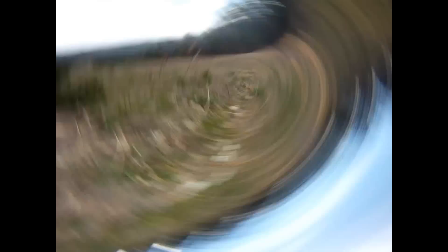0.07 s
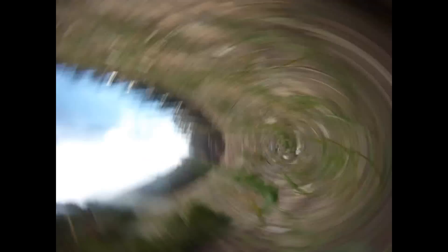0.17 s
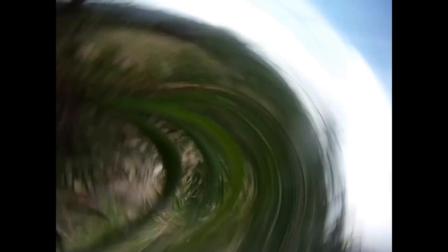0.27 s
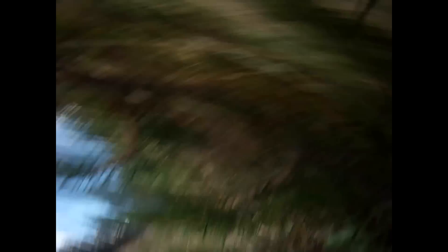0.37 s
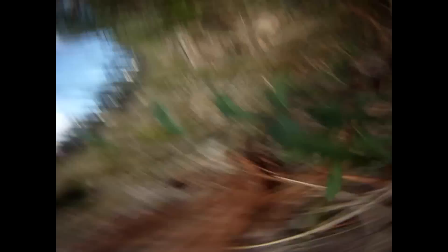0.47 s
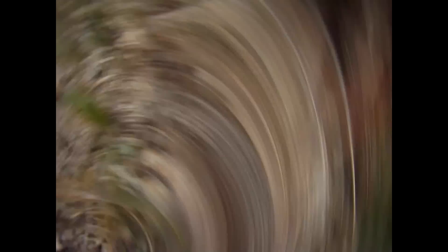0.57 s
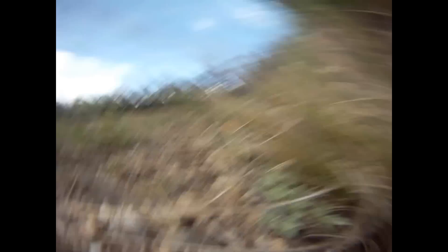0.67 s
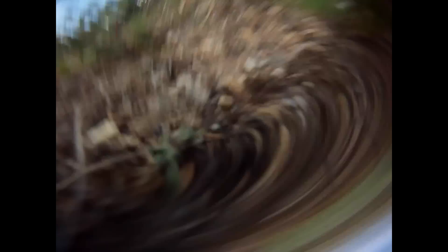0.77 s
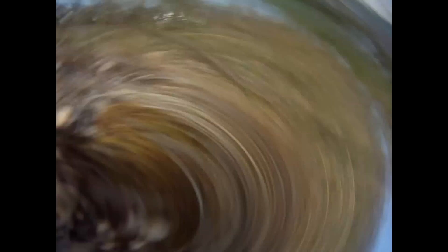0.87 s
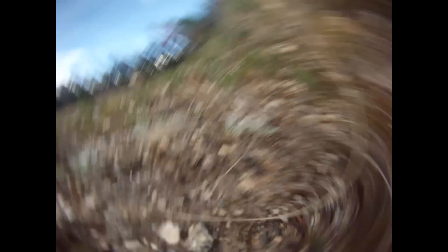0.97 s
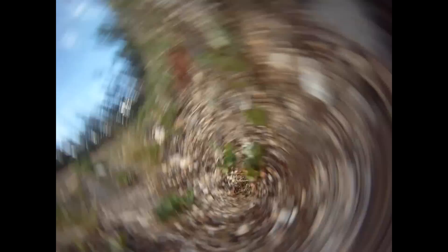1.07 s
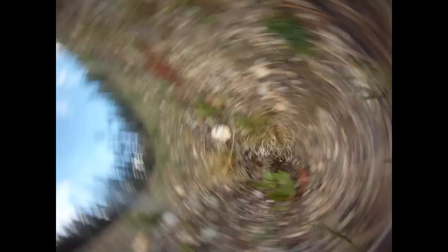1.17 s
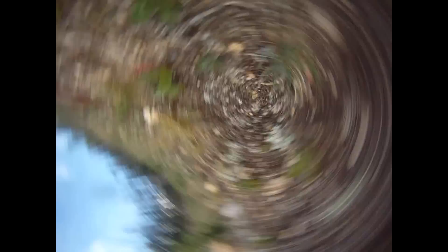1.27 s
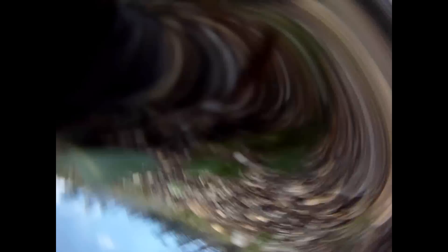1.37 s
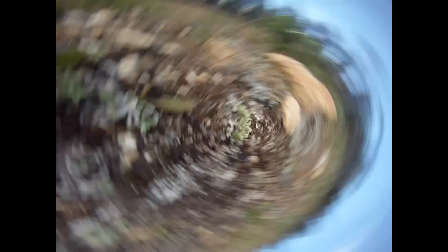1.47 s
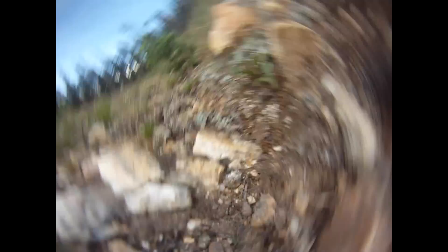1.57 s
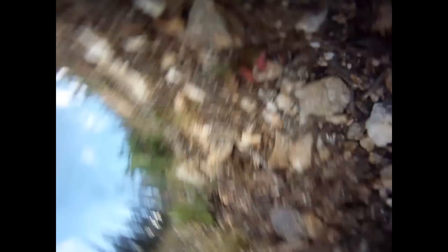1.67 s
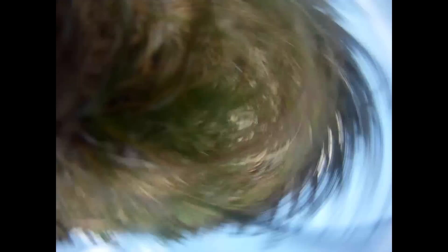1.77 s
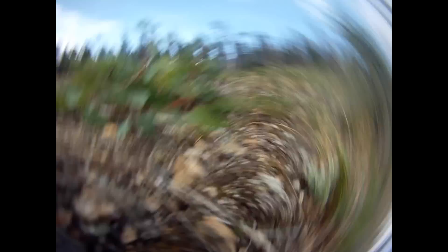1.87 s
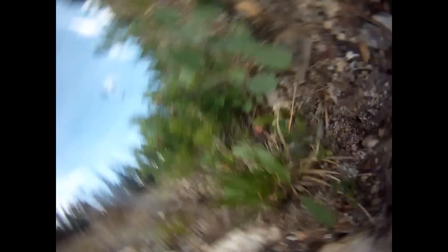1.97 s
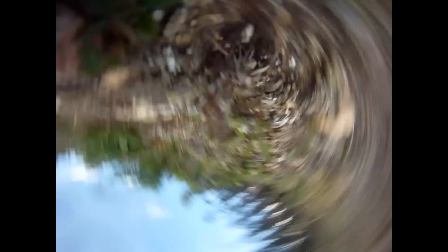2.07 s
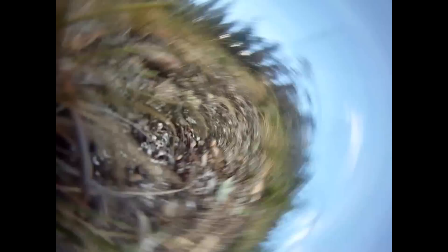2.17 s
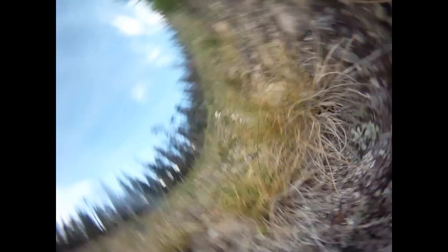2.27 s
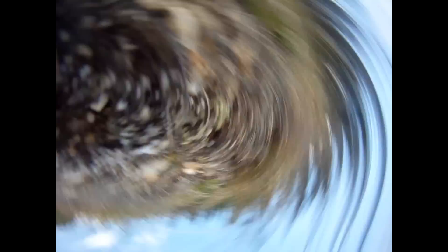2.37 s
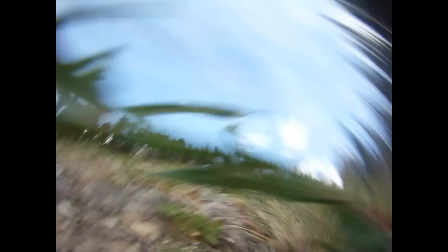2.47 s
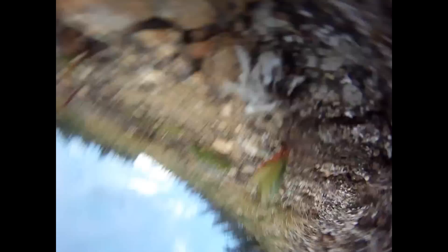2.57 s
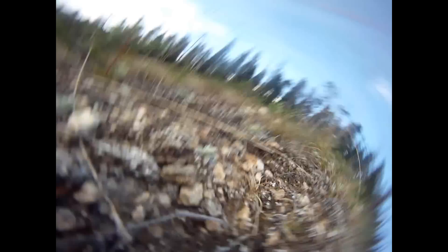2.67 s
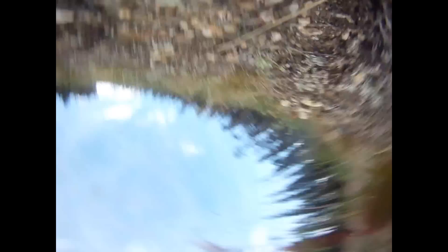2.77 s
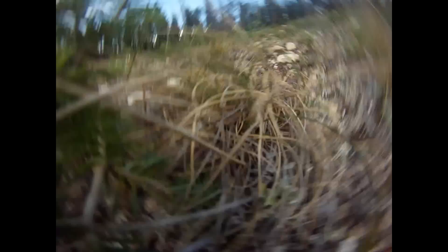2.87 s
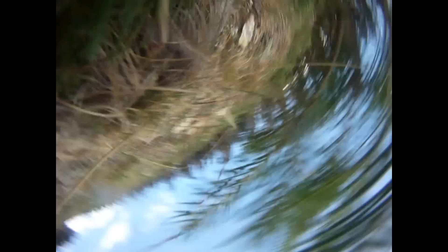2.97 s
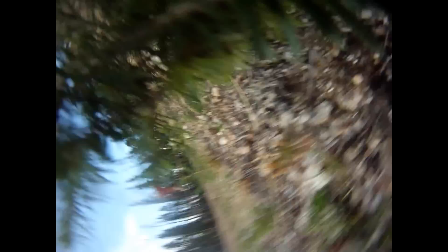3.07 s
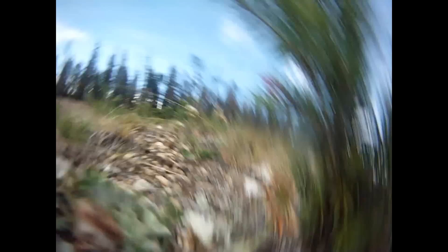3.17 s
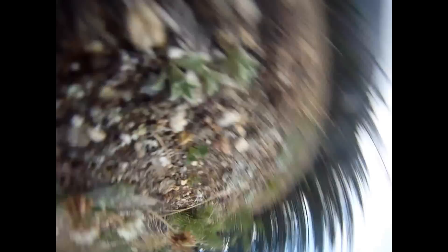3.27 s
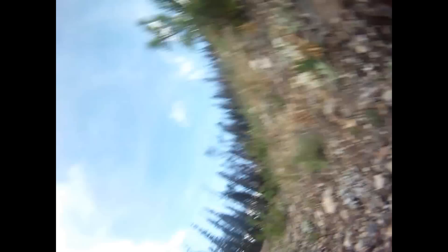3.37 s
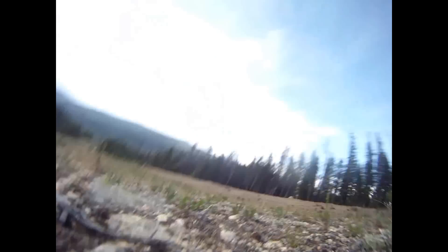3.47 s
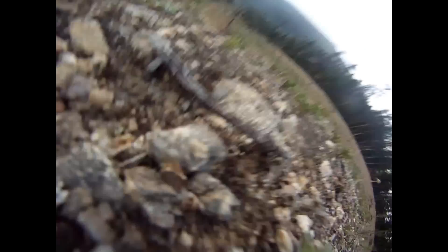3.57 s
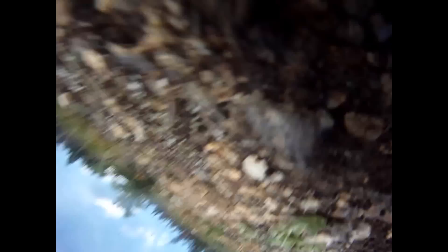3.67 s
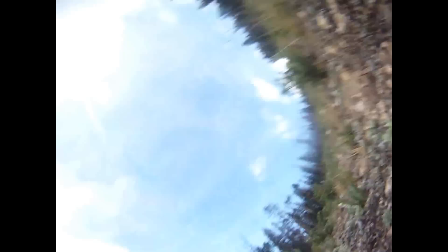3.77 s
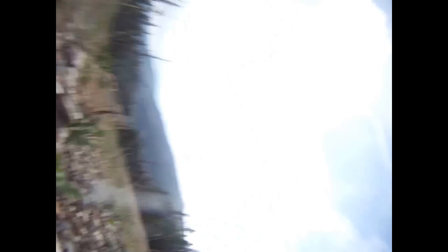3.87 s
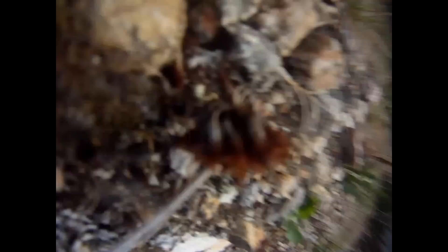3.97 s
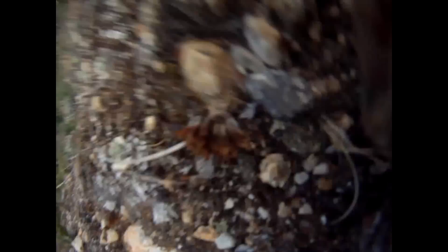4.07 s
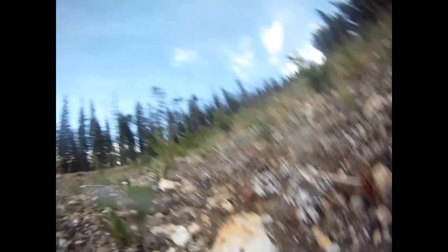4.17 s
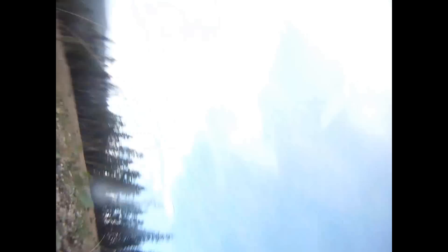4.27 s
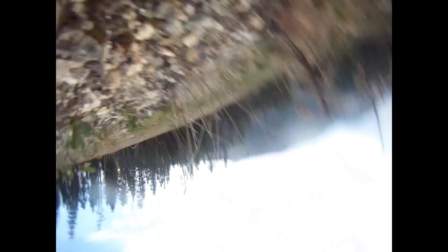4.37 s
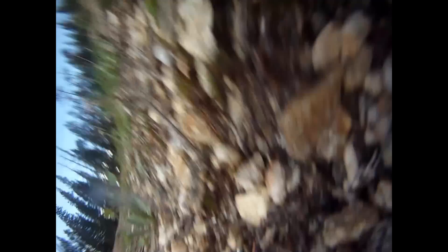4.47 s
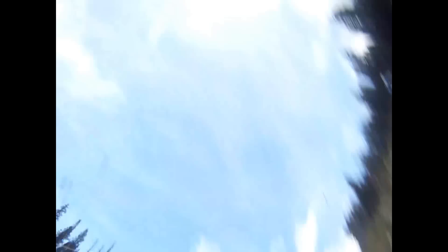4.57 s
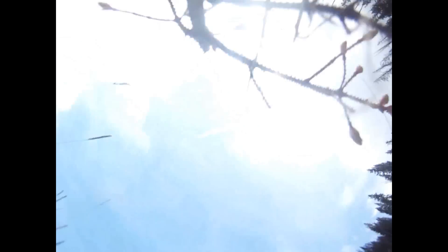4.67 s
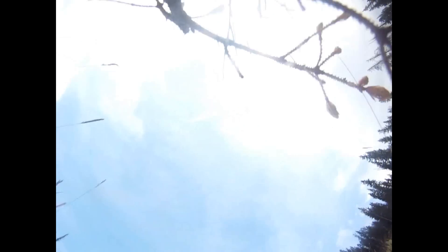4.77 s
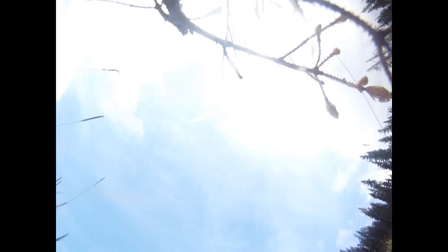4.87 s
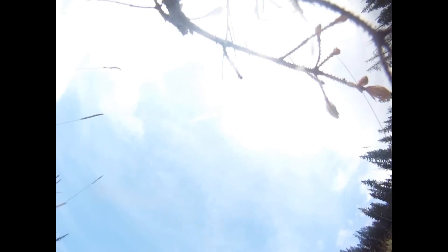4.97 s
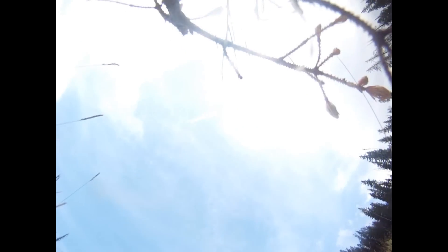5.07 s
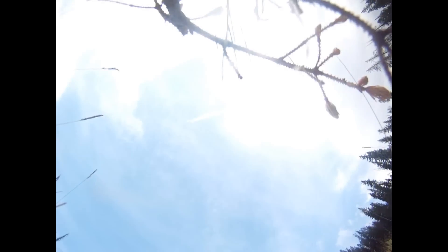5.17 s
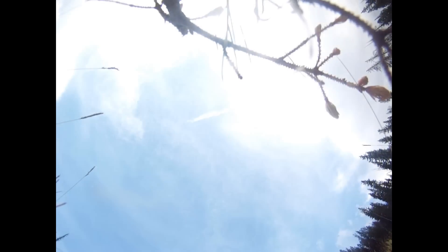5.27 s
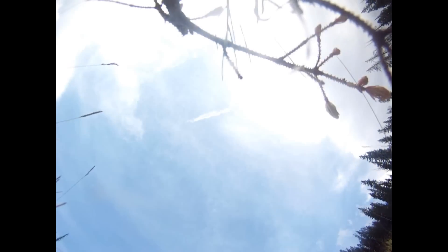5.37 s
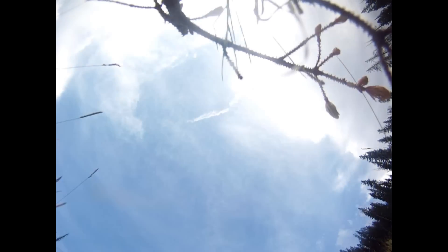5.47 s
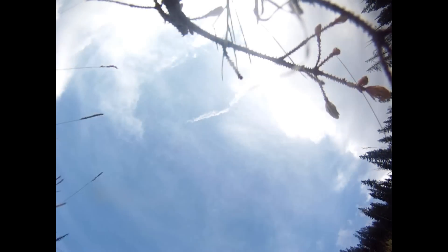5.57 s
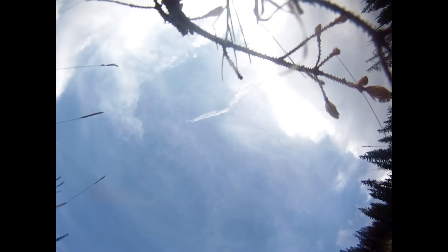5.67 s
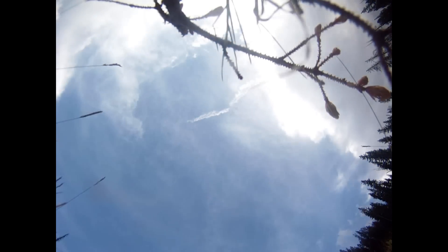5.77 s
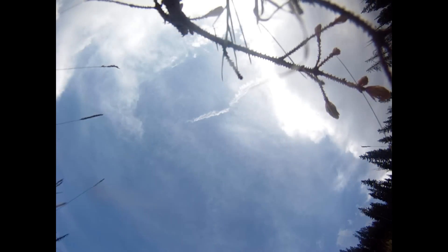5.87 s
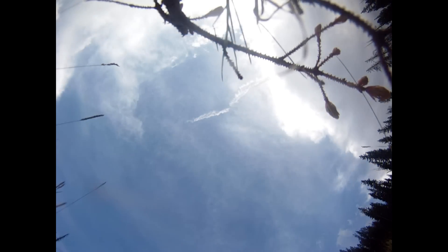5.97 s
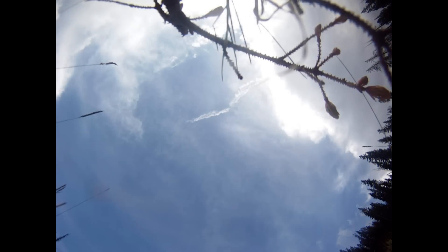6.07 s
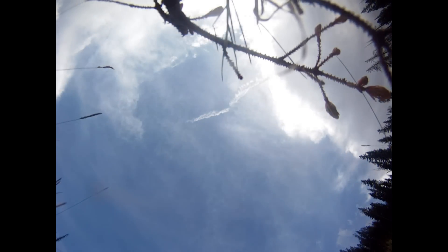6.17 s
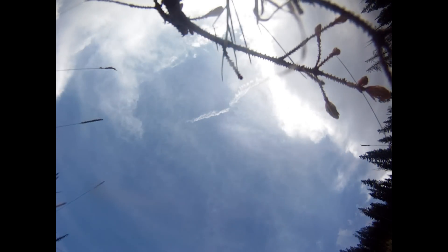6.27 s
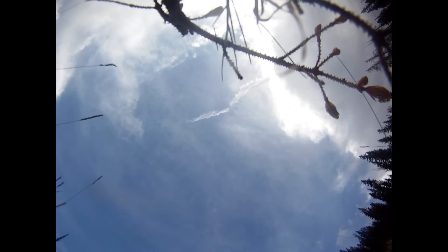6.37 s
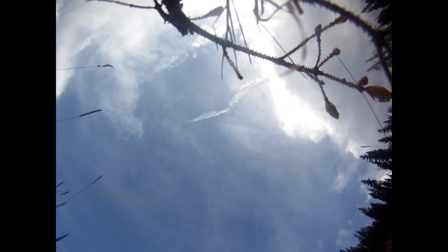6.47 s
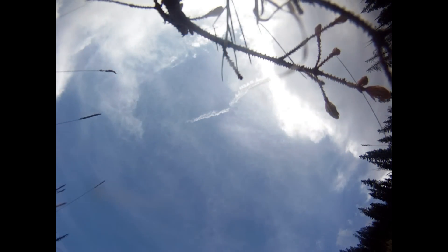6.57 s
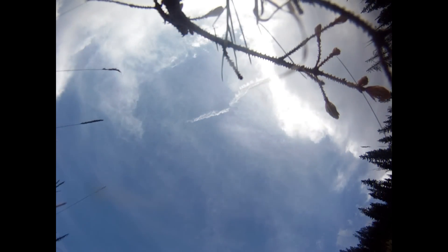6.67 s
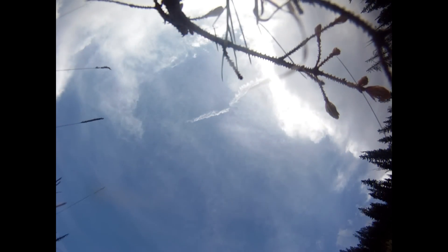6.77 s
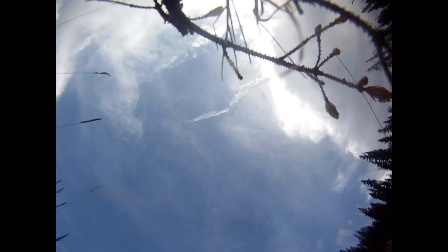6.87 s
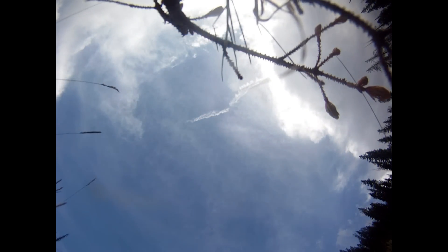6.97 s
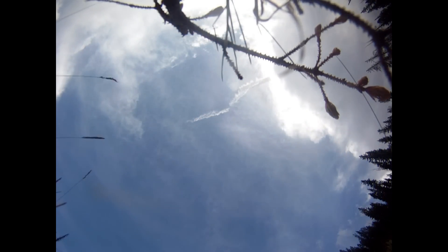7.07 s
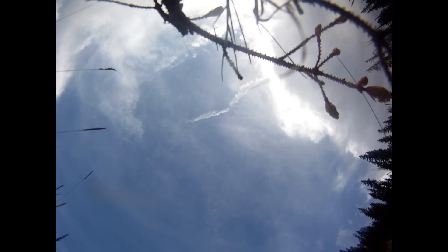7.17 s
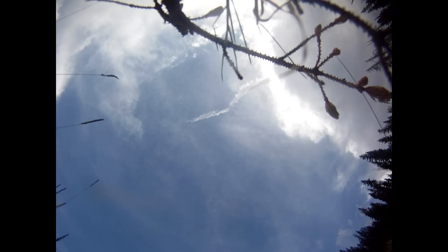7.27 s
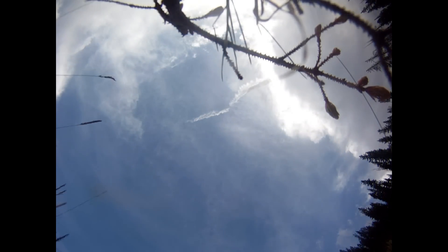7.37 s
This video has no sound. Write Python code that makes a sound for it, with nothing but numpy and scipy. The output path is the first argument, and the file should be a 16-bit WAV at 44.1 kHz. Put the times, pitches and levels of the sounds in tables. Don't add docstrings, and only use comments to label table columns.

```python
import sys
import numpy as np
from scipy import signal
from scipy.fft import rfft, irfft
from scipy.io import wavfile
from scipy.ndimage import uniform_filter1d

SR = 44100
rng = np.random.default_rng(int(sys.argv[2]) if len(sys.argv) > 2 else 0)


def rack_gain(trim_db):
    fader = np.asarray(trim_db, float)
    return 10 ** (fader / 20)


def waveform_to_disk(signal):
    frames = np.transpose(np.atleast_2d(signal))
    scaled = np.clip(frames, -1, 1) * 32767
    samples = np.round(scaled).astype(np.int16)
    wavfile.write(sys.argv[1], SR, samples)


N = 327661
TIME_S = np.arange(N) / SR
REST_S = 4.81


def rms_one(x):
    return x / np.sqrt(np.mean(x ** 2) + 1e-20)


def lowpass(x, hz, order=2):
    return signal.sosfilt(signal.butter(order, hz, fs=SR, output="sos"), x)


def highpass(x, hz, order):
    return signal.sosfilt(signal.butter(order, hz, "high", fs=SR, output="sos"), x)


def drift(hz):
    return rms_one(lowpass(rng.standard_normal(N), hz))


# frequency in Hz, density in dB per Hz.
FLOOR = [(20, 0.5), (86, 3.5), (300, -5), (850, -12), (2140, -16), (4940, -21.5), (7500, -26.5),
         (10000, -27.5), (15000, -29)]


def floor():
    hz = np.fft.rfftfreq(N, 1 / SR) + 1
    floor_hz, floor_db = np.transpose(FLOOR)
    colour = rack_gain(np.interp(np.log(hz), np.log(floor_hz), floor_db)) * (hz > 18)
    return rack_gain(-66.5) * rms_one(irfft(rfft(rng.standard_normal(N)) * colour, N))


# time in seconds, level in dB.
WIND = [
    (0.09, -49.5),
    (0.271, -50),
    (0.601, -57),
    (2.752, -66.5),
    (3.6, -67),
    (3.951, -52),
    (4.9, -54),
    (5.1, -72.5),
]


def wind():
    at, db = np.transpose(WIND)
    level = rack_gain(np.interp(TIME_S, at, db, right=-120) + 3.6 * drift(14.0))
    return level * rms_one(highpass(drift(80.0), 22.0, 2))


def ducked(quiet, loud, depth_db, back_db_per_s):
    climb = back_db_per_s * TIME_S
    cut_db = np.clip(20 * np.log10(np.abs(loud) + 1e-9) + 27.0, 0, depth_db)
    return quiet * rack_gain(climb - np.maximum.accumulate(np.maximum(cut_db + climb, climb)))


def tones(rows, partials_db, wobble, flutter_db):
    out, waver, flutter = np.zeros(N), drift(60.0), rack_gain(flutter_db * drift(300.0))
    for start, end, hz, db in rows:
        i, j = round(start * SR), round(end * SR)
        phase = 2 * np.pi * np.cumsum(hz * (1 + wobble * waver[i:j])) / SR
        wave = sum(rack_gain(p) * np.sin((k + 1) * phase) for k, p in enumerate(partials_db))
        out[i:j] += rack_gain(db + 3) * signal.windows.tukey(j - i, .3) * flutter[i:j] * wave
    return out


# start in seconds, end in seconds, pitch in Hz, level in dB.
HUMS = [
    (2.72, 2.82, 612, -79.5),
    (3.42, 3.53, 624, -85),
]
# level in dB, from the fundamental up.
HUM_PARTIALS_DB = [3.5, -4, -18, -12, -16]


def hums():
    return tones(HUMS, HUM_PARTIALS_DB, wobble=.004, flutter_db=0.0)


# start in seconds, end in seconds, pitch in Hz, level in dB.
SQUEAKS = [
    (0.472, 0.515, 4650, -55),
    (0.484, 0.515, 7300, -59),
    (0.612, 0.63, 2900, -57),
    (0.638, 0.652, 2900, -54),
    (0.692, 0.724, 2920, -46),
    (0.74, 0.763, 2980, -44),
]
# level in dB, from the fundamental up.
SQUEAK_PARTIALS_DB = [5.5, -20]


def squeaks():
    return tones(SQUEAKS, SQUEAK_PARTIALS_DB, wobble=.007, flutter_db=5.0)


# frequency in Hz, width in Hz, level in dB.
HOLLOW = [(352, 170, -9.5), (595, 290, -2), (820, 362, 3), (1400, 320, 0.5)]
# frequency in Hz, width in Hz, level in dB.
RING = [(1605, 310, -6.5), (2089.6, 293, 4), (2512, 555, -1), (2960, 270, -1), (3582, 380, -5.5),
        (4750, 490, -9.5), (5440, 340, -14), (5970, 1500, -14), (6750, 2300, -13), (7310, 220, -10.5),
        (8400, 790, -16.5), (9847, 430, -6.5), (9820, 97, -15.5)]
# frequency in Hz, width in Hz, level in dB.
PORT = [(13400, 700, -17), (14150, 400, -10), (15050, 500, -14)]


def shell(force, modes):
    out, click, turn = 0, 0, drift(14)
    for k, (hz, width_hz, db) in enumerate(modes):
        r = np.exp(-np.pi * max(width_hz, 20) / SR)
        b = rack_gain(db) * np.array([1, 0, -1]) * (1 - r * r) / 2
        a = [1, -2 * r * np.cos(2 * np.pi * hz / SR), r * r]
        turning = rack_gain(2.8 * np.roll(turn, 9973 * k))
        out = out + (-1) ** k * signal.lfilter(b, a, force * turning + 1e-18)
        click = click + (-1) ** k * signal.lfilter(b, a, signal.unit_impulse(2000))
    return out / np.sqrt(np.sum(click ** 2))


# frequency in Hz, width in Hz, level in dB.
LENS = [(3680, 55, 0), (8400, 60, -8)]
# time in seconds, level in dB.
LENS_BLOWS = [
    (3.398, -36),
    (3.67, -41),
]


def lens():
    force = np.zeros(N)
    for s, db in LENS_BLOWS:
        force[round(s * SR)] = 20 * rack_gain(db + 10.5)
    return shell(force, LENS)


def grit(per_s, spread_db):
    sizes = rack_gain(spread_db * np.minimum(rng.exponential(1, N), 4)) * rng.choice([-1, 1], N)
    return rms_one(sizes * (rng.random(N) < per_s / SR))


def contact(rows, rise_ms, fall_ms, tail_db, tail_ms):
    ring, hollow, ms = np.zeros(N), np.zeros(N), np.arange(4000) * 1000 / SR
    for s, db, hold_ms, hollow_db in rows:
        after = np.maximum(ms - rise_ms - hold_ms, 0)
        fall = np.exp(-after / fall_ms) + rack_gain(tail_db) * np.exp(-after / tail_ms)
        shape = np.minimum(ms / rise_ms, 1) * fall
        i = max(round((s - rise_ms / 1000) * SR), 0)
        ring[i:i + len(ms)] += rack_gain(db) * shape[:N - i]
        hollow[i:i + len(ms)] += rack_gain(db + hollow_db) * shape[:N - i]
    return ring, hollow


# time in seconds, peak level in dB.
TICKS = [(5.0195, -48), (5.1459, -50), (5.21, -47), (5.2804, -52.5), (5.382, -44), (5.6934, -49.5),
         (5.8943, -41.5), (5.9006, -52), (5.9139, -47), (5.9636, -59), (6.028, -49), (6.319, -55.5),
         (6.786, -50.5), (6.8545, -46), (6.928, -42.5), (7.1889, -44.5), (7.2389, -36), (7.241, -43.5),
         (7.256, -52.5), (5.08, -53), (5.111, -53), (5.626, -58), (5.712, -52), (5.988, -53), (6.012, -57),
         (6.162, -55.5), (6.778, -58), (6.982, -51)]


def ticks():
    rows = [(s, db - 14.5, .5, -6) for s, db in TICKS]
    ring, hollow = contact(rows, rise_ms=0.12, fall_ms=0.61, tail_db=-3.5, tail_ms=3.6)
    crush = rng.standard_normal(N)
    return shell(ring * crush, RING + PORT) + shell(hollow * crush[::-1], HOLLOW[-1:])


# start in seconds, end in seconds, level in dB at start, at end.
DRAGS = [(0.0, 0.063, -24, -49.5), (0.111, 0.272, -66, -68.5), (0.283, 0.35, -21, -31.5),
         (0.36, 0.545, -38, -39), (0.595, 0.7, -53, -56.5), (0.687, 0.79, -42.5, -40),
         (0.955, 1.08, -61, -70.5), (1.106, 1.158, -35.5, -58), (1.537, 1.579, -26, -37),
         (1.725, 1.903, -50, -42.5), (1.971, 2.067, -46, -61.5), (2.173, 2.199, -59.5, -32),
         (2.186, 2.279, -30.5, -42.5), (2.243, 2.287, -40.5, -35.5), (2.277, 2.322, -50, -43),
         (3.29, 3.306, -59, -52), (3.302, 3.31, -30.5, -26.5), (2.357, 2.383, -19, -23),
         (2.382, 2.506, -28, -46.5), (2.49, 2.593, -44.5, -58.5), (2.819, 3.02, -35.5, -43),
         (3.011, 3.108, -27, -32), (3.108, 3.221, -23.5, -33), (3.669, 3.828, -38, -51.5),
         (3.841, 3.892, -37, -43), (3.907, 3.999, -39, -55), (4.015, 4.04, -64, -71.5),
         (4.259, 4.327, -29.5, -48), (4.307, 4.41, -38.5, -54), (4.644, 4.68, -34, -23),
         (4.684, 4.806, -41, -55), (4.813, 4.837, -67, -50), (4.84, 4.9, -72, -64.5),
         (4.901, 4.973, -62, -61.5), (4.973, 5.053, -71, -70)]
# start in seconds, level in
# dB, length in seconds.
SKIDS = [(0.064, -16, 0.012), (0.5608, -13, 0.022), (0.777, -22.5, 0.079), (0.877, -43.5, 0.028),
         (0.918, -32, 0.032), (1.166, -34.5, 0.024), (1.219, -32, 0.018), (1.402, -21, 0.077),
         (1.579, -26, 0.031), (1.678, -60.5, 0.063), (2.0975, -16, 0.0049), (2.141, -47.5, 0.0096),
         (2.588, -15, 0.016), (3.235, -10, 0.041), (3.404, -23.5, 0.0084), (3.885, -21.5, 0.036),
         (3.987, -18, 0.02), (4.075, -18, 0.042), (4.117, -29.5, 0.071), (4.217, -13, 0.029),
         (4.446, -30.5, 0.058), (4.516, -29, 0.022), (4.56, -32, 0.027), (0.639, -38.5, 0.037),
         (0.67, -58, 0.021), (1.247, -72.5, 0.55), (2.151, -64, 1), (2.631, -50.5, 0.21),
         (3.546, -68, 0.039), (4.169, -24.5, 0.094), (4.188, -21, 0.03), (4.204, -28.5, 0.049)]
# end in seconds, level in dB, length in seconds.
BRUSHES = [
    (0.563, -42.5, 0.043),
    (1.101, -17, 0.045),
    (1.098, -40.5, 0.19),
    (1.964, -13, 0.056),
    (2.349, -20.5, 0.018),
    (2.709, -15, 0.045),
    (3.241, 2.5, 0.014),
    (4.446, -10, 0.041),
    (4.508, -28, 0.018),
    (4.649, -16.5, 0.016),
]
LIFT_S, FADE_DB, SWELL_DB = 0.004, 50, 30


def rubbing():
    level = np.zeros(N)
    rows = (DRAGS + [(end, end + LIFT_S, db, db - FADE_DB) for _, end, _, db in DRAGS]
            + [(s, s + length, db, db - FADE_DB) for s, db, length in SKIDS]
            + [(s - length, s, db - SWELL_DB, db) for s, db, length in BRUSHES])
    for start, end, start_db, end_db in rows:
        i = max(round(start * SR), 0)
        j = max(round(end * SR), round(start * SR) + 2)
        level[i:j] += rack_gain(np.linspace(start_db, end_db, j - i))
    return uniform_filter1d(level, size=24, origin=11)


# time in seconds, share of sharp grit from 0 to 1.
BRIGHT = [
    (0.0, 0.93),
    (2.0, 1),
    (3.6, 0.71),
    (3.95, 0.56),
    (4.4, 0.55),
    (4.699, 0.94),
]


def sharpness():
    return np.interp(TIME_S, *np.transpose(BRIGHT))


def slides():
    rub = rubbing() * rack_gain(1.3 * drift(60) + 3.0 * drift(500))
    stony = TIME_S < REST_S
    grains = rub * (stony * grit(2400, 4.2) + (1 - .55 * stony) * rng.standard_normal(N))
    soft = lowpass(grains, 3500)
    grains = soft + np.clip(sharpness(), 0, 1.5) * (grains - soft)
    return rack_gain(-1.5) * shell(grains, RING + PORT) + rack_gain(-12.5) * shell(rub * grit(3200, 6.9), HOLLOW)


PEBBLE_HOLLOW_DB = -12.5
LOOSE_PER_S, LOOSE_OVER_DB, LOOSE_SPREAD_DB = 88, -7, 4


def loose_pebbles():
    when, size, tone = rng.random((3, 600))
    s = np.cumsum(-np.log(when)) / LOOSE_PER_S
    s = s[s < REST_S]
    level_db = 20 * np.log10(np.minimum(rubbing(), rack_gain(-29.0)) + 1e-9)
    rows = []
    for t, u, v in zip(s, np.maximum(size, .1), tone):
        db = level_db[round(t * SR)] + LOOSE_OVER_DB - LOOSE_SPREAD_DB * np.log(u)
        rows.append((t, db, .6, PEBBLE_HOLLOW_DB + 24 * (v - .5)))
    ring, hollow = contact(rows, rise_ms=0.4, fall_ms=0.9, tail_db=-29.5, tail_ms=3.0)
    crush = rng.standard_normal(N)
    return shell(ring * crush, RING + PORT) + shell(hollow * crush[::-1], HOLLOW)


# time in seconds, level in dB, contact in ms,
# hollow tone in dB against the ring.
LANDINGS = [(0.0006, -4, 0.43, -22), (0.2859, -7, 7.6, -18.5), (0.5652, -7.5, 4.8, -15),
            (0.7889, -12, 6.4, -10), (0.9082, -5.5, 5, -15), (1.0609, -8, 2.5, -41), (1.3978, -7, 1, -49),
            (1.5308, -12, 4.2, -12), (1.674, -7.5, 4.5, -4.5), (1.7435, -14.5, 4.8, -19),
            (1.945, -15.5, 2.9, -19), (2.1, -7.5, 4.74, -7), (2.438, -8, 3.5, -21.5),
            (2.54, -4.5, 3.2, -21), (2.59, -8.5, 1.7, 0.5), (2.7019, -15, 2.9, -40.5),
            (2.838, -6, 4.3, -11.5), (3.0171, -14, 6.2, -27), (3.2399, -1, 1.73, -22.5),
            (3.3081, -4.5, 5.3, -16), (3.3978, -7.5, 1.2, -25.5), (3.5365, -12, 0.52, -1),
            (3.67, -8.5, 6, -14), (3.8775, -6, 3.44, -12), (4.0668, -5.5, 3.7, -14.5),
            (4.3165, -5, 1.4, -32), (4.5182, -6, 0.87, -5.5), (4.5641, -9, 0.68, -1),
            (4.668, -5.5, 5.7, -12.5), (4.768, -6, 0.885, -5.5)]
# time in seconds, level in dB,
# contact in ms, hollow tone in dB against the ring.
CORNERS = [(0.026, -25, 3, -11.5), (0.06, -24.5, 5.3, -21.5), (0.3376, -9, 5, -14.5),
           (0.8047, -12, 1.4, -1), (1.0913, -7, 3.44, -11.5), (1.1728, -20.5, 0.62, -35),
           (1.416, -14.5, 0.69, -6.5), (1.5505, -16.5, 1.1, -13.5), (1.6796, -9.5, 5, -23),
           (1.9574, -13.5, 3.8, -19), (2.1938, -13, 6.6, -2), (2.3464, -19, 9.4, -11.5),
           (2.3629, -12, 0.91, -30), (2.3772, -13.5, 1, -18), (2.4271, -20, 10, -4),
           (2.6779, -17.5, 0.34, 0), (3.0665, -17.5, 1.2, -31), (3.1469, -15, 1.23, -2),
           (3.254, -20, 3.7, -26.5), (3.541, -7, 0.35, -30.5), (3.72, -16.5, 1.3, -3),
           (3.8424, -13.5, 4.25, -1), (4.0773, -14.5, 2.1, -12), (4.0827, -17, 2.1, -9),
           (4.22, -12.5, 0.61, -7), (4.27, -10, 2.5, -10.5), (4.4167, -11, 0.8, -17.5),
           (4.438, -13.5, 3.2, -4.5), (4.4585, -12, 1.2, -2.5), (4.6498, -13.5, 4.1, -38.5)]
# time in seconds, level in dB.
PEBBLES = [(0.015, -22.5), (0.0502, -18), (0.4648, -21), (0.4766, -31), (0.5422, -29.5), (0.748, -32.5),
           (0.771, -29), (1.4046, -15.5), (1.4357, -24.5), (1.5565, -25.5), (1.5697, -33), (1.5832, -32),
           (1.7615, -19), (1.8592, -48), (1.916, -24), (1.9253, -33), (2.822, -37.5), (2.8837, -19.5),
           (2.9987, -26), (3.0424, -14), (3.182, -28.5), (3.2144, -35.5), (3.804, -23.5), (3.9169, -21),
           (3.983, -16), (4.1098, -20.5), (4.1293, -21), (4.2057, -19.5), (4.2616, -15.5), (4.7956, -22),
           (1.0712, -25.5), (1.0875, -21.5), (4.2243, -16.5), (1.707, -51), (2.155, -58), (2.67, -39),
           (1.043, -41), (1.73, -53), (2.178, -42), (0.3137, -25), (0.334, -19.5)]
# time in seconds, peak in dB,
# hollow tone in dB against the ring.
GRAVEL = [(0.1213, -47, -15), (0.1994, -49, 10), (0.245, -43, 4), (0.2516, -39, -1), (0.3688, -26, -32),
          (0.405, -13, -18), (0.468, -8, -12), (0.5167, -43, -22), (0.525, -30, -12), (0.5363, -11, 1),
          (0.6225, -26, -17), (0.64, -27.5, -44), (0.6806, -27, -32), (0.7092, -18.5, -15),
          (0.7313, -23, -6.5), (0.962, -25, -10), (0.9855, -32, -15), (1.0125, -32.5, -21),
          (1.818, -23.5, -15), (1.8292, -18, -7), (1.866, -15.5, -22), (1.891, -22, -20), (1.98, -25, -18),
          (2.0439, -19, -29), (2.14, -35, -20), (2.3112, -19, -20), (2.356, -3, -17), (2.3945, -43, -26),
          (2.4083, -8, -25), (2.5005, -12, -16), (2.64, -27, -14), (2.9056, -15.5, 4.5), (2.9482, -39, -8),
          (2.9698, -11.5, -39), (3.0295, -7, -17), (3.082, -20, -11), (3.1116, -27, -19),
          (3.117, -20, -18.5), (3.1307, -3, -9), (3.704, -4, -7), (3.7514, -9, -7), (3.781, -40, -13),
          (3.7996, -24, -16), (3.954, -28, -11), (3.9706, -28, -15), (4.1215, -10, -5), (4.1422, -29, 5),
          (4.1766, -24, -8), (4.1942, -9, -11), (4.346, -26, -14), (4.355, -19.5, -12), (4.718, -26, -15)]
# time in seconds, level in dB.
THUDS = [(0.0365, -33), (0.105, -59), (0.568, -23.5), (1.11, -44), (2.591, -20.5), (2.4945, -28.5),
         (2.8648, -23.5), (3.702, -30), (3.8106, -29.5), (3.857, -61), (4.279, -31), (4.287, -20),
         (4.4088, -54), (4.4522, -26), (4.5003, -42), (4.7844, -16)]
GRAVEL_TOP_DB, GRAVEL_FORCE_DB, THUD_OVER_DB = -10, -13.5, 30


def blow_rows():
    return (LANDINGS + CORNERS + [(s, db, .9, PEBBLE_HOLLOW_DB) for s, db in PEBBLES]
            + [(s, min(db, GRAVEL_TOP_DB) + GRAVEL_FORCE_DB, .5, hollow_db) for s, db, hollow_db in GRAVEL]
            + [(s, db - THUD_OVER_DB, 1.2, THUD_OVER_DB) for s, db in THUDS])


def trails():
    rows = [(s, db - 38, ms, 0) for s, db, ms, _ in blow_rows()]
    trail, _ = contact(rows, rise_ms=0.6, fall_ms=7.1, tail_db=-57.5, tail_ms=3.0)
    return lowpass(shell(trail * rng.standard_normal(N), RING[:5]), 4500, order=4)


# deepest moment in seconds, depth in dB, squeeze in ms.
SQUEEZES = [(0.291, -8.5, 1.2), (0.3417, -11, 0.76), (0.571, -5, 1.4), (0.792, -12, 2.4), (0.807, -2, 2.16),
            (0.914, -12.5, 1.8), (1.0939, -3.5, 1.77), (1.4202, -6, 3.33), (1.434, -21, 7.8),
            (1.6774, -7.5, 2.3), (1.6848, -2, 0.28), (1.7439, -13.5, 1.48), (1.9582, -5.5, 2.85),
            (2.1005, -1, 0.55), (2.201, -16, 4), (2.4413, -6, 1.82), (2.681, -9.5, 3), (2.69, -24, 3.1),
            (2.703, -11, 0.96), (2.844, -4.5, 0.46), (3.1577, -13, 7.2), (3.3105, -14.5, 1.65),
            (3.4, -13.5, 1.33), (3.6738, -4, 2.4), (3.7197, -2.5, 0.28), (3.846, -7, 4.8),
            (4.073, -11, 1.14), (4.271, -6, 0.81), (4.67, -5.5, 3.1), (4.772, -9.5, 2.1)]
# time in seconds, level in dB, length in ms.
PULLS = [
    (3.539, -1.5, 3.76),
    (3.998, -32.5, 6),
    (4.508, -17.5, 3),
]
NUDGE_LAG_S, NUDGE_DB, NUDGE_MS = 0.0012, -19, 2.2


def squeezes():
    push = np.zeros(N)
    nudges = [(s + NUDGE_LAG_S, db + NUDGE_DB, NUDGE_MS) for s, db, _, _ in LANDINGS[1:] + CORNERS]
    for sign, (at, db, ms) in [(-1, row) for row in SQUEEZES + nudges] + [(1, row) for row in PULLS]:
        i, half = round(at * SR), max(int(1.217 * ms * SR / 1000), 8)
        push[i - half:i + half] += sign * rack_gain(db + 2.0) * np.hanning(2 * half)
    return highpass(push, 45.0, 1)


def cracks():
    force = np.zeros(N)
    clicks = [(s - 0.0004, db + 9.0) for s, db, _, _ in blow_rows()]
    for s, db in clicks + [(s, db - 2.5) for s, db in TICKS]:
        force[max(round(s * SR), 0)] -= rack_gain(db)
    return shell(force, RING + PORT + HOLLOW[1:])


def knocks():
    rows = [(s, db - (ms < 1.5 and db < -14), ms, hollow_db) for s, db, ms, hollow_db in blow_rows()]
    ring, hollow = contact(rows, rise_ms=0.35, fall_ms=1.2, tail_db=-30, tail_ms=3.2)
    shove = 1 + (ring / rack_gain(-6.0)) ** 6.1
    crush = grit(20000, 1.0)
    dull = lowpass(ring * (shove - 1) * crush, 3000.0)
    return shell(ring * crush + dull, RING + PORT) + shell(hollow * shove * crush[::-1], HOLLOW)


# time in seconds, own tone in Hz, own tone in dB,
# main ring in dB, treble in dB.
FACES = [(.001, 2900, 2, 3, -1), (.049, 1380, 8.5, 0, 3.5), (.061, 3870, 10.5, -6, 0),
         (.287, 1295, -2, 1.5, 0.5), (.339, 3220, 0.5, -0.5, -4.5), (.565, 420, 9, -1.5, -6),
         (.908, 3000, -2.5, -2.5, 0.5), (1.06, 2533, 5, -6, -0.5), (1.09, 1813, 2.5, -2.5, -2),
         (1.171, 3130, 8.5, -8, 4.5), (1.397, 824, -1.5, 2.5, -1.5), (1.532, 820, 6, 0.5, 2),
         (1.674, 877, 6, 1.5, -1), (1.744, 3482, 2.5, -5, -1.5), (1.915, 2460, -3.5, 5.5, 2),
         (1.947, 1275, 2.5, 3.5, 0.5), (2.099, 487, -5, 9, 2), (2.193, 970, 1, -1, -1),
         (2.347, 2920, 5, 1.5, 1.5), (2.427, 1497, -1.5, 0, 0), (2.542, 1499, -4.5, -1, -1.5),
         (2.589, 2475, 2.5, -3.5, 1), (2.676, 2952, 5.5, -1.5, 2.5), (2.838, 905, -3, 2, 3),
         (2.884, 4730, 2, 2, 2.5), (3.018, 4710, 6, -1, -2), (3.234, 2898, -3.5, 0.5, -3.5),
         (3.308, 9960, 3, -4.5, -2), (3.397, 3616, 10, -6.5, -1), (3.536, 2750, 4, -5.5, 1.5),
         (3.669, 3784, 9, 0, -1), (3.719, 1346, 6.5, 2.5, 2.5), (3.915, 3140, 7.5, -6, 4.5),
         (4.066, 2480, 2, -2.5, 2.5), (4.205, 2892, 8, 0, 3.5), (4.27, 1592, 4, -1, -1),
         (4.439, 817, 4.5, 3, 0), (4.564, 894, 6, -2, 1), (4.647, 2654, -1.5, -6.5, -1.5),
         (4.768, 4750, -1, 1, 1)]
# time in seconds, own tone in Hz,
# own tone in dB, main ring in dB, treble in dB.
SPOTS = [(5.02, 2520, 6.5, -2, -0.5), (5.146, 4700, 3.5, 0.5, -0.5), (5.383, 2535, 4.5, -3, 1),
         (5.693, 1496, -0.5, 3, -6.5), (5.894, 1200, 7, 0.5, 6), (5.913, 4700, 9, 0, 0),
         (6.028, 3190, 3, 2, -3), (6.319, 3000, 8.5, 0.5, -2.5), (6.786, 2950, 12.5, -1, -4),
         (6.854, 4810, 8.5, -5, 0), (6.928, 3175, 7, -1, 1), (7.188, 3000, 2, -1, -0.5),
         (7.238, 2610, 5, 1, 3.5)]
FACE_S, FACE_LEAD_S, FACE_Q = .045, .003, 5


def faced(x):
    out, rows = x.copy(), FACES + SPOTS
    treble = highpass(x, 4500, 2)
    main = signal.lfilter(*signal.iirpeak(2150, 3, fs=SR), x)
    for (s, hz, tone_db, main_db, treble_db), after in zip(rows, rows[1:] + [(9,)]):
        i = max(round((s - FACE_LEAD_S) * SR), 0)
        j = round(min(s + FACE_S, after[0] - FACE_LEAD_S) * SR)
        tone = signal.lfilter(*signal.iirpeak(hz, FACE_Q, fs=SR), x[i:j])
        change = (rack_gain(tone_db) - 1) * tone
        change = change + (rack_gain(main_db) - 1) * main[i:j] + (rack_gain(treble_db) - 1) * treble[i:j]
        out[i:j] += change * signal.windows.tukey(j - i, .1)
    return out


def damped(x):
    soil = np.clip(1.3 * (1 - sharpness()), 0, .9)
    return x - soil * signal.lfilter(*signal.iirpeak(6000, 1.6, fs=SR), x)


def scene():
    shaken = damped(faced(knocks() + slides() + ticks() + loose_pebbles() + cracks() + trails()))
    blows = shaken + squeezes() + lens()
    rest = ducked(wind() + floor(), blows, depth_db=11.5, back_db_per_s=41.0)
    return (blows + rest + squeaks() + hums())[None]


def overload(x, top):
    return x / (1 + (x / top) ** 8) ** (1 / 8)


def roll_off(x):
    return signal.sosfilt(signal.butter(12, 16480, fs=SR, output="sos"), x)


# frequency in Hz, width in Hz, gain left as a factor.
PORT_DIPS = [(6050, 700, .4), (11750, 1200, .04), (12300, 1200, .04)]


def record(dry):
    x = overload(highpass(dry, 40.0, 1), 0.44)
    for hz, width_hz, gain in PORT_DIPS:
        b, a = signal.iirnotch(hz, hz / width_hz, fs=SR)
        x = gain * x + (1 - gain) * signal.lfilter(b, a, x)
    x = x + rack_gain(-88.0) * rng.standard_normal(x.shape)
    x = signal.sosfilt(signal.cheby2(10, 40, 16000, fs=SR, output="sos"), x)
    return roll_off(overload(x, .56))


dry = scene()
out = record(dry)
waveform_to_disk(out)
```